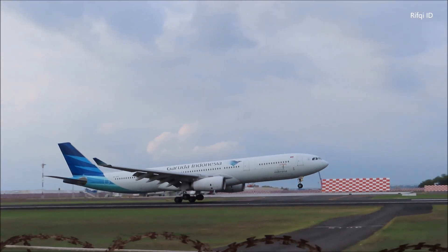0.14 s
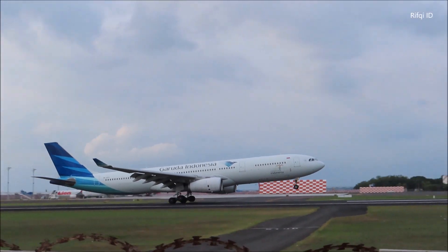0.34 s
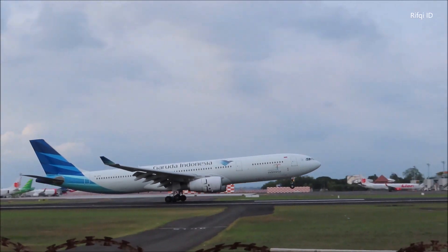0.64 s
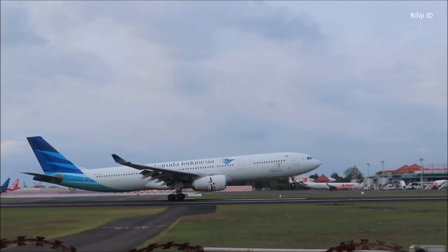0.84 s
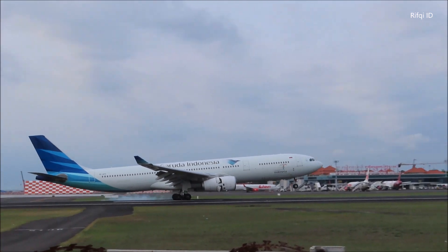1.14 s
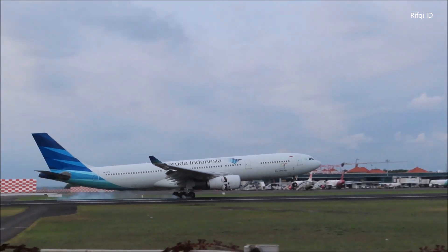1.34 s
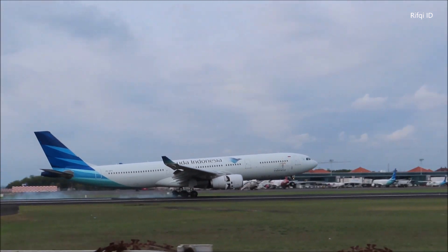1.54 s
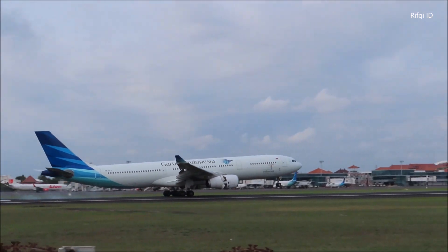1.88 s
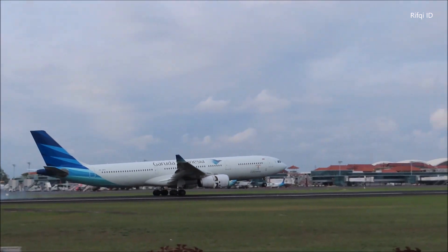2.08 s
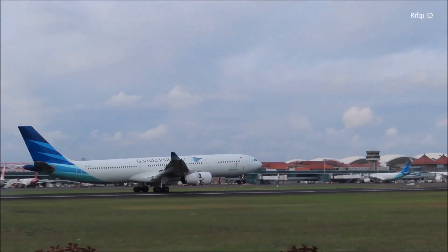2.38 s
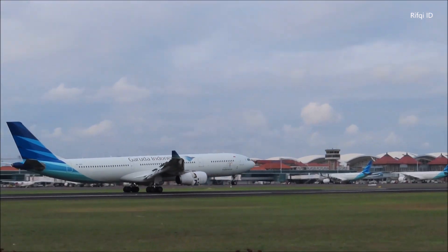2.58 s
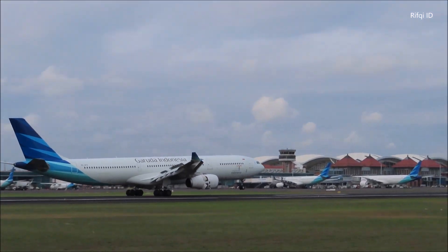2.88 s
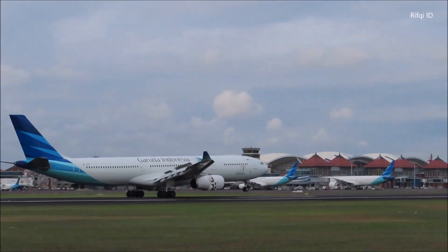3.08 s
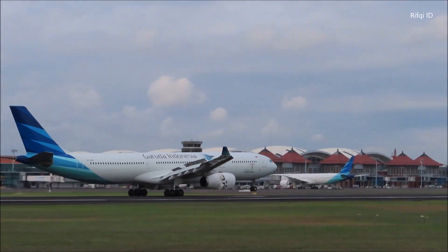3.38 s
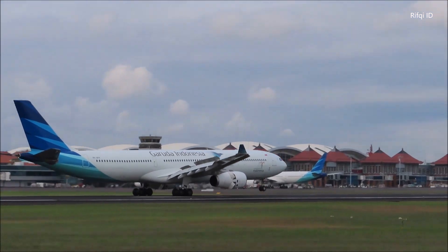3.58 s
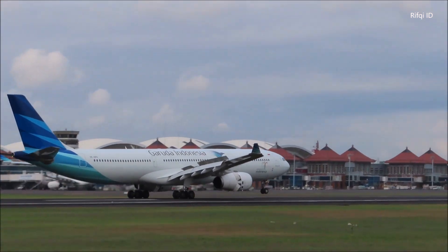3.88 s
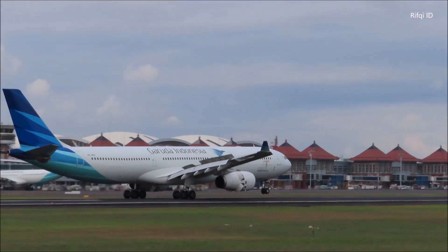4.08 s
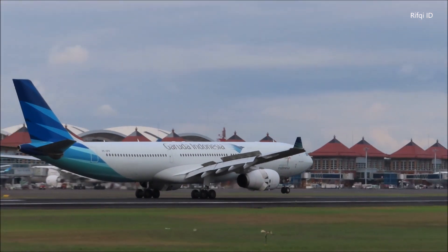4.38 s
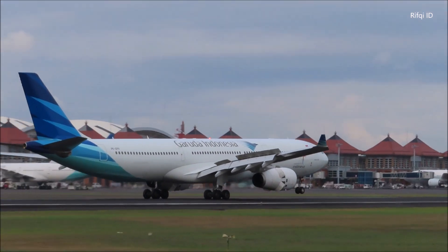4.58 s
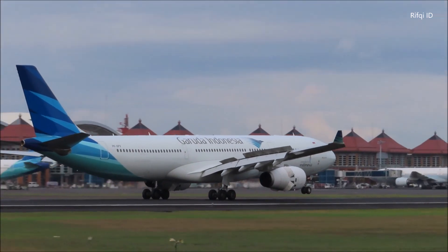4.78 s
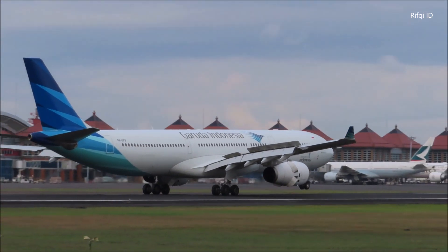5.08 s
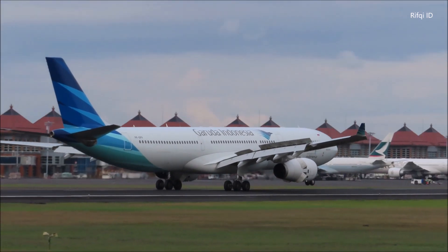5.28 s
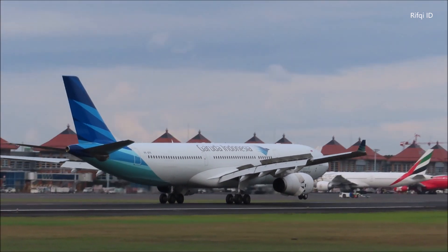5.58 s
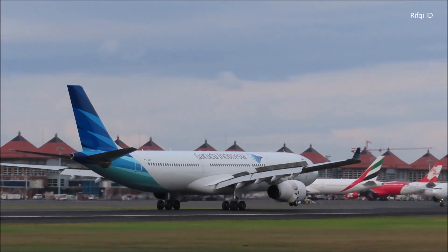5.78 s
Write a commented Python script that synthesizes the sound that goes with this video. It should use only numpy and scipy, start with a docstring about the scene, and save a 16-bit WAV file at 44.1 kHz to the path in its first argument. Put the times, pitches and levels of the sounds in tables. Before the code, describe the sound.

Strong wind booms and splutters on the microphone as a twin-jet airliner touches down, its roaring rush swelling as it rolls past.

```python
"""On an open runway, a twin-jet airliner touches down and rolls past while wind beats on the microphone.
The engines are coloured noise: they rush, and after 3.7 s the exhaust roar swells as the tail turns near.
Faint gliding tones make the engine whine, and a brief bright noise is the tyres scuffing.
Wind is deep noise shaped by gusts and single eddies: it booms and splutters, then eases to a soft rumble."""
import sys
import numpy as np
from scipy import signal
from scipy.fft import rfft, irfft
from scipy.io import wavfile
from scipy.ndimage import uniform_filter1d

SR = 44100
rng = np.random.default_rng(int(sys.argv[2]) if len(sys.argv) > 2 else 0)


def file_out(sig):
    """Save sig as 16-bit WAV at sys.argv[1]."""
    # one column per channel
    cols = np.atleast_2d(sig).T
    # limit, then scale
    lim = np.clip(cols, -1, 1)
    pcm = np.round(lim * 32767).astype(np.int16)
    wavfile.write(sys.argv[1], SR, pcm)


N = 261513
TIME = np.arange(N) / SR
FREQ = np.maximum(np.arange(N // 2 + 1) * SR / N, 1)

# A "base" level has a further offset added by the function that uses it.
# Edges of the body, roar, hiss and air bands: low f/Hz, high f/Hz
JET_BANDS = [(650, 1400), (1600, 3300), (4000, 7000), (8000, 12000)]
# Broad colour of the jet noise: f/Hz, relative level per Hz/dB
JET_COLOUR = [(25, -21), (55, -8), (130, 0.5), (320, -4), (520, -6.5), (1000, -3.5), (2000, -4),
              (3200, -4.5), (5200, -9.5), (6500, -14), (7700, -19), (8400, -23.5), (10000, -28.5),
              (12000, -36.5), (14500, -49)]
# Base loudness of the engine roar at the microphone: t/s, level/dB
ROAR_LEVEL = [(0.0, -34.5), (0.23, -32.5), (0.46, -35), (0.58, -41), (0.7, -39), (0.8, -39.5),
              (0.97, -39.5), (1.08, -33.5), (1.24, -36.5), (1.37, -29.5), (1.48, -29.5), (1.6, -33),
              (1.87, -27), (1.98, -30.5), (2.04, -23.5), (2.19, -24.5), (2.25, -27.5), (2.4, -25),
              (2.5, -29), (2.68, -26), (2.77, -28), (3.01, -26.5), (3.09, -32), (3.32, -30.3), (3.45, -29),
              (3.65, -29), (3.75, -26), (3.85, -19), (3.95, -19), (4.22, -20), (4.31, -18), (4.68, -20),
              (4.87, -18.5), (5.1, -21.5), (5.26, -24.5), (5.38, -24.5), (5.56, -18.5), (5.75, -21),
              (5.92, -23)]
# Base level of the body of the rush against the roar, thin early in the roll: t/s, level/dB
BODY_AGAINST_ROAR = [(0.0, 2), (0.6, 3.5), (1.25, 0.5), (1.45, -6.5), (1.85, -11), (2.04, -6), (2.55, -6.5),
                     (3.02, -13.5), (3.2, -7.5), (3.6, -1.5), (3.71, 4), (3.87, -3), (4.15, -0.5),
                     (4.33, -4.5), (4.5, -2.5), (4.87, -4), (5.3, -2), (5.56, -2.4), (5.9, -5.5)]
# Flares and fades of the treble against the roar: t/s, level/dB before weighting
BRIGHTNESS = [(0.0, 1.5), (0.43, 4.5), (0.61, 2.5), (0.78, 4), (1.08, 4.5), (1.7, 3), (1.8, -2),
              (1.95, 2.5), (2.4, -1.1), (2.81, 0.5), (2.92, -4), (3.01, 1.5), (3.22, 2.5), (3.45, -1.5),
              (3.65, 1), (3.8, 3), (3.97, 1), (4.24, -2), (4.32, 1), (4.42, -1.5), (4.7, -2), (4.87, -2),
              (5.02, 0.6), (5.28, 2), (5.5, 1), (5.58, 3), (5.66, 0.1), (5.9, 0.5)]
# Hiss, then air: base side-on level at the usual roar/dB, share of the roar's swing (0-1),
# change when tail-on/dB, weight of the brightness (factor)
TREBLE = [(-37, 0.89, -1.5, 1.4), (-49, 0.68, -11.5, 0.71)]
# The ground reflection cancels part of the middle for a moment: t/s, length/s, f/Hz, level/dB
HOLLOWS = [(1.652, 0.17, 1600, -4.5), (3.06, 0.086, 1410, -5.5), (3.937, 1, 1400, -3)]
# Humps and hollows that reflections leave in the jet noise: f/Hz before sinking, width/Hz, level/dB
RIPPLE = [(700, 140, 1.5), (920, 130, -3.5), (1180, 200, 1.5), (1530, 170, -2.4), (1840, 260, 3),
          (2210, 240, -2.8), (2630, 320, 2.8), (2940, 150, -1), (3490, 180, -1.6), (3780, 220, 1),
          (4110, 240, -2.3), (5250, 400, 2.5), (5700, 250, -1.3), (6490, 240, -3.3), (6980, 500, 2.1)]
# The humps and hollows sink in pitch as the aircraft passes: t/s, pitch factor
RIPPLE_SINK = [(0.0, 1.06), (1.3, 1.05), (1.9, 1.028), (2.5, 1.015), (3.5, 1.005), (4.7, 0.994),
               (5.9, 0.975)]
# Diffuse share of the jet noise, side against mid: f/Hz, level/dB
DIFFUSE = [(60, -66), (150, -64), (280, -57), (700, -97), (1300, -67), (2300, -85), (4200, -14),
           (5500, -18), (7500, -0.5), (10000, -13), (14000, 6)]
# Differences between the two microphone ports, added where they overlap:
# f/Hz, width/Hz, right above left level/dB, right leads/rad
PORTS = [(4400, 1150, 4.5, 0.45), (5430, 860, 2.5, .1), (7300, 2240, 5, 1.3)]
# Base level of the main tyres scuffing up to speed at touchdown: t/s, level/dB
SCUFF_LEVEL = [(1.15, -50), (1.29, -36.5), (1.38, -32.5), (1.47, -35.5), (1.6, -36), (1.74, -36),
               (1.95, -51)]
# Colour of the scuffing rubber: f/Hz, relative level per Hz/dB
SCUFF_COLOUR = [(500, -27), (1400, -21), (2200, -3), (2700, 4), (3700, -1), (5200, -0.5), (6500, -8.5),
                (8500, -15.5), (12000, -25)]
# Faint fan and turbine tones: start t/s, end t/s, start f/Hz, end f/Hz, base level/dB
WHINES = [(-0.4, 0.9, 4160, 4200, -50), (-0.2, 0.9, 2750, 2775, -53), (1.95, 2.6, 1485, 1450, -39),
          (3.08, 3.45, 1435, 1395, -42), (2.1, 2.35, 2715, 2690, -41), (1.76, 2.06, 7240, 7230, -54),
          (1.92, 2.12, 4820, 4780, -46)]
# Short spits in the hiss: t/s, level/dB, length/s
SPITS = [(1.553, -29, 0.0091), (1.665, -37, 0.017), (1.873, -31.5, 0.015), (2.18, -35, 0.04),
         (2.688, -38, 0.03), (4.335, -38, 0.04)]
# Gusts that swell and die at the microphone: t/s, base level/dB, length/s
GUSTS = [(0.15, -25.5, 0.26), (0.52, -17, 0.3), (0.9, -16, 0.49), (1.2, -13, 0.25), (1.55, -17, 0.27),
         (2.07, -16.5, 0.25), (2.39, -19.5, 0.2), (2.79, -28.5, 0.15), (3.14, -30.5, 0.18),
         (3.35, -28.5, 0.051), (4.42, -32, 0.23), (4.5, -19.5, 0.058), (4.86, -19, 0.12), (5.09, -23, 0.11),
         (5.67, -31.5, 0.2), (5.91, -23.5, 0.079)]
# Strongest single eddies: t/s before the rise, base level/dB, length/s
BUFFETS = [(0.072, -6.5, 0.006), (0.092, -11, 0.019), (0.154, -4.5, 0.007), (0.239, 1, 0.004),
           (0.3, -18, 0.0096), (0.356, -3.5, 0.008), (0.374, 1, 0.0085), (0.421, -3.5, 0.0057),
           (0.444, -5.5, 0.0095), (0.488, -2, 0.018), (0.522, -2, 0.016), (0.547, -1.5, 0.012),
           (0.572, 1, 0.0064), (0.638, -2.5, 0.0085), (0.651, -4.5, .012), (0.728, 1, 0.019),
           (0.795, -4.5, 0.01), (0.861, -7, 0.013), (0.872, -6, 0.0061), (0.931, -6, 0.0072),
           (1.002, -0.5, 0.0074), (1.092, -3.5, 0.016), (1.184, 0.5, 0.016), (1.284, -1, 0.0059),
           (1.305, 0.5, 0.012), (1.487, -5, .007), (1.573, -15, 0.016), (1.708, -4, 0.018),
           (1.753, -6, 0.014), (1.899, -9, 0.0085), (1.934, -9.5, 0.012), (2.022, -7.5, 0.0079),
           (2.064, -7, 0.015), (2.122, -13, 0.0067), (2.149, -1.5, 0.0085), (2.365, -5, 0.0047),
           (2.458, -12, 0.0051), (2.563, -13, 0.0069), (2.605, -11, 0.0067), (2.649, -15, .006),
           (2.706, -14.5, 0.0049), (2.763, -14, .006), (2.807, -10.5, 0.012), (2.86, -13, 0.0079),
           (2.913, -14, 0.0044), (2.974, -15.5, 0.022), (3.013, -12, 0.0061), (3.033, -9, 0.0078),
           (3.051, -3, 0.017), (3.109, -19, 0.018), (3.14, -8, 0.0088), (3.151, -5.5, 0.0062),
           (3.173, -14, 0.0054), (3.198, -11, 0.016), (3.224, -3.5, 0.0039), (3.282, -12, 0.021),
           (3.328, -13.5, 0.0059), (3.354, -13, 0.024), (3.5, -19.5, 0.023), (4.01, -22.5, 0.016),
           (4.375, -14.5, .007), (4.495, -7, 0.007), (4.87, -7.5, 0.0092), (4.915, -8, 0.0056),
           (5.012, -5, 0.005), (5.305, -17.5, .014), (5.607, -11, 0.0084), (5.692, -16, .008),
           (5.781, -10.5, 0.0088), (5.897, -9.5, .007)]
# Hardest eddies, which splutter: t/s, base level/dB, f/Hz, length/s
SPLUTTERS = [(0.5, -25, 730, 0.0046), (0.529, -14, 865, 0.0056), (0.584, -26, 800, .006),
             (0.742, -27, 736, 0.013), (0.88, -27.5, 850, 0.015), (1.108, -17, 680, 0.0062),
             (1.155, -16.5, 760, 0.0045), (1.206, -16, 800, 0.0055), (1.228, -27, 850, 0.016),
             (1.266, -26, 910, 0.022), (1.297, -25.5, 970, 0.02), (1.346, -26, 840, 0.017),
             (3.149, -27.5, 655, 0.005)]
# Colour of the hollow early gusts: f/Hz, relative level per Hz/dB
HARD_WIND = [(20, -46), (50, -21.5), (100, -11), (170, -6), (260, -3), (380, -3.5), (470, -1), (500, -16),
             (535, -21.5), (700, -27), (1000, -38.5), (2000, -22.5)]
# Colour of the soft later gusts: f/Hz, relative level per Hz/dB
SOFT_WIND = [(20, -33), (50, -15), (100, -10.5), (160, -2.5), (260, 2.5), (350, -0.5), (480, -9.5),
             (650, -12), (1000, -58), (2000, -112)]
# Swirl of the wind between the ports, side against mid: f/Hz, level/dB
SWIRL = [(60, -68), (150, -69), (260, -45), (420, -28), (700, -20), (1200, -2.5)]

TURN_S = (0.99, 5.47)  # the aircraft turns from side-on to tail-on between these times
USUAL_ROAR_DB, USUAL_WIND_DB = -29, -20  # reference levels from which swings are counted
HOLLOW_OCTAVES = 0.88  # width of a passing hollow
EASE_S = 3.42  # the gusts start to turn soft here
BREEZE_DB = -41  # base wind pressure between the gusts
EDDY_DB, EDDY_SCATTER_DB, EDDY_FOLLOW = -20.5, 0.5, 0.6  # level in usual wind, spread, share of wind's swing
EDDY_COUNT, EDDY_LENGTH_S = 55, 0.0098  # lesser eddies come at random
BUFFET_RISE_S = 0.0084
TOP_HZ = 14400


def jet(body_db=-1.73, roar_db=0.34, hiss_db=-2.5, air_db=-0.1, rumble_db=-7, shimmer_db=1.06, flicker_db=0.64):
    """Exhaust, airframe and rolling noise; moving air makes the bands flicker together and alone."""
    body, roar, hiss, air = jet_levels()
    spectrum = two_ears(undb(over_freq(JET_COLOUR)), DIFFUSE)
    middle = spectrum.mean(axis=0)
    levels = [body + body_db, roar + roar_db, hiss + hiss_db, air + air_db]
    gains = []
    for (low, high), level in zip(JET_BANDS, levels):
        in_band = (FREQ > low) & (FREQ < high)
        own_level = np.std(irfft(middle * in_band, N))
        gains.append(level - 20 * np.log10(own_level))
    # the deep rumble follows the body at half its swing
    rumble = (gains[0] + gains[0].max()) / 2 + rumble_db
    gains = [rumble] + gains
    # the rumble sits at 300 Hz, the others in the middle of their bands
    places = np.r_[np.log2(300), np.log2(JET_BANDS).mean(axis=1)]
    together = flicker_db * walk(27)
    octaves = np.arange(8, 14.1, .5)  # log2 of frequency in Hz
    out = 0
    for octave, pick in zip(octaves, np.eye(len(octaves))):
        band = irfft(spectrum * np.interp(np.log2(FREQ), octaves, pick), N)
        # blend the gains of the two nearest places
        shares = [np.interp(octave, places, one) for one in np.eye(len(places))]
        db = sum(share * gain for share, gain in zip(shares, gains))
        alone = shimmer_db * walk(11.3)
        out = out + band * undb(db + hollow_db(octave) + together + alone)
    return out


def jet_levels():
    """Body, roar, hiss and air in dB: the treble swings less than the roar, flares, and fades tail-on."""
    roar = np.interp(TIME, *np.transpose(ROAR_LEVEL))
    body = roar + np.interp(TIME, *np.transpose(BODY_AGAINST_ROAR))
    bright = np.interp(TIME, *np.transpose(BRIGHTNESS))
    tail_on = np.interp(TIME, TURN_S, [0, 1])
    treble = []
    for db, follow, turn_db, weight in TREBLE:
        swing = follow * (roar - USUAL_ROAR_DB)
        treble.append(db + swing + turn_db * tail_on + weight * bright)
    hiss, air = treble
    return body, roar, hiss, air


def hollow_db(octave):
    """Passing dips that the ground reflection cuts into the band at this octave."""
    total = 0
    for s, length, hz, db in HOLLOWS:
        nearness = bell(octave, np.log2(hz), HOLLOW_OCTAVES)
        total = total + db * bell(TIME, s, length) * nearness
    return total


def reflections(x, early_share=0.32):
    """Reflections colour the rush: humps and hollows deepen once it is rolling and sink as it passes."""
    times, factors = np.transpose(RIPPLE_SINK)
    spectrum, coloured = rfft(x), 0
    # fade from each pitch of the ripple to the next
    for factor, pick in zip(factors, np.eye(len(times))):
        ripple = undb(sum(db * bell(FREQ, hz * factor, width) for hz, width, db in RIPPLE))
        coloured = coloured + irfft(spectrum * ripple, N) * np.interp(TIME, times, pick)
    share = np.interp(TIME, [1.2, 2.0], [early_share, 1])
    return x + share * (coloured - x)


def whines(whine_db=0.0):
    """Blade tones surface from the rush, waver and glide in pitch as the aircraft passes."""
    out = 0
    for start, end, start_hz, end_hz, db in WHINES:
        glide = np.interp(TIME, [start, end], [start_hz, end_hz])
        hz = glide * (1 + .005 * walk(50))
        tone = unit(np.sin(2 * np.pi * np.cumsum(hz) / SR))
        progress = np.clip((TIME - start) / (end - start), 0, 1)
        swell = np.sqrt(np.abs(np.sin(np.pi * progress)))
        out = out + tone * swell * undb(db + 2 * walk(5.2))
    return out * undb(whine_db)


def spits():
    """Brief bright spits in the hiss, cut from noise strongest near 5 kHz."""
    colour = undb(over_freq([(2000, -16), (5000, 0), (10000, -11), (14000, -28)]))  # Hz, dB
    return unit(irfft(two_ears(colour, DIFFUSE), N)) * bursts(SPITS)


def tyres(scuff_db=2.5, judder_db=3.0, judder_hz=50):
    """Rubber slides on the runway with a brief bright rush that judders in level."""
    slide = unit(irfft(two_ears(undb(over_freq(SCUFF_COLOUR)), DIFFUSE), N))
    # silent before and after the scuff
    db = np.interp(TIME, *np.transpose(SCUFF_LEVEL), left=-np.inf, right=-np.inf)
    return slide * undb(db + scuff_db + judder_db * walk(judder_hz))


def wind(gust_db=1.37, churn_db=1.75, churn_hz=40, bass_hz=200, bass_squeeze=1.0, squeeze_from_db=-22):
    """Turbulence at the microphone: hollow and hard at first, then soft."""
    strength = wind_strength()
    pressure = undb(strength + gust_db + churn_db * walk(churn_hz))
    hits = eddy_hits(strength)
    soft = np.clip((TIME - EASE_S) / 0.039, 0, 1)
    hard_gusts = np.sqrt(1 - soft) * boom(HARD_WIND, pressure, hits)
    soft_gusts = np.sqrt(soft) * boom(SOFT_WIND, pressure, hits)
    gusts = hard_gusts + soft_gusts
    # fast wind makes smaller eddies, so the bass grows less than the rest while the gusts are hard
    bass = irfft(rfft(gusts) * bell(FREQ, 0, 2 * bass_hz), N)
    recent_hits = uniform_filter1d(hits, size=SR // 20)
    speed_db = 20 * np.log10(undb(strength) + recent_hits / 2)
    excess_db = np.maximum(speed_db - squeeze_from_db, 0) * (1 - soft)
    return gusts - bass + bass * undb(-bass_squeeze * excess_db)


def wind_strength():
    """Wind pressure in dB: gusts on top of a light breeze, added as powers."""
    return 20 * np.log10(np.hypot(undb(BREEZE_DB), bursts(GUSTS)))


def eddy_hits(strength, buffet_db=-6.5):
    """Envelope of single eddies: listed strong ones, and lesser ones at random that grow with the wind."""
    place, size = rng.uniform(-1.054, 1, (EDDY_COUNT, 2)).T
    # one eddy to each equal slice of time, moved at random
    times = (np.arange(EDDY_COUNT) + .5 + place / 2) * TIME[-1] / EDDY_COUNT
    wind_swing = np.interp(times, TIME, strength) - USUAL_WIND_DB
    dbs = EDDY_DB + EDDY_FOLLOW * wind_swing + EDDY_SCATTER_DB * size
    lesser = [(s, db, EDDY_LENGTH_S) for s, db in zip(times, dbs)]
    strong = [(s + BUFFET_RISE_S, db + buffet_db, length) for s, db, length in BUFFETS]
    return bursts(lesser + strong)


def boom(points, pressure, hits):
    """Churning noise and single eddies in one colour; its steep skirts also bound the shortest eddies."""
    colour = undb(over_freq(points)) / (1 + (FREQ / 1500) ** 6)
    skirts = np.sqrt(np.minimum(colour / undb(-8), 1))
    churn = steady(noise(colour / skirts), 0.02) * pressure
    eddies = steady(noise(colour / skirts), 0.0075) * hits
    # half of the skirt is applied after the envelopes
    return irfft(rfft(churn + eddies) * skirts, N)


def splutter(splutter_db=2.5, rasp_db=-4.5, rasp_hz=610, rasp_width_hz=420, rasp_flicker_db=3.5):
    """Strong wind rasps just above the boom, and the hardest eddies break into short splutters."""
    # doubling the decibels makes the rasp grow as the square of the wind pressure
    rasp_level = 2 * wind_strength() + rasp_db + rasp_flicker_db * walk(41)
    out = noise(bell(FREQ, rasp_hz, rasp_width_hz)) * undb(rasp_level)
    for s, db, hz, length in SPLUTTERS:
        flutter = steady(noise(bell(FREQ, hz, 520)), .003)
        out = out + flutter * bursts([(s, db + splutter_db, length)])
    return out


def at_ports(x, swirl_hz=60):
    """Small eddies reach the two microphone ports unequally, large ones alike."""
    side = irfft(rfft(x * walk(swirl_hz)) * undb(over_freq(SWIRL)), N)
    return np.array([x + side, x - side])


def two_ears(gain, side_points):
    """Spectra of a stereo noise: mid is shared, side is opposite, and the ports differ in some bands."""
    mid, side = rfft(rng.standard_normal((2, N)))
    share = undb(over_freq(side_points))
    sign = np.array([[-1], [1]])  # left, right
    # real part: level difference; imaginary part: phase lead
    skew = sum((np.log(undb(db)) + 1j * lead) * bell(FREQ, hz, width) for hz, width, db, lead in PORTS)
    blend = (mid + sign * share * side) / np.sqrt(1 + share ** 2)
    return gain * np.exp(sign * skew / 2) * blend


def undb(db):
    """Decibels to gain."""
    return 10 ** (np.asarray(db) / 20)


def unit(x):
    """Scale to an rms (average strength) of 1."""
    return x / np.sqrt(np.mean(x ** 2))


def over_freq(points):
    """Join (Hz, value) points on a log-frequency axis."""
    hz, value = np.transpose(points)
    return np.interp(np.log(FREQ), np.log(hz), value)


def bell(x, centre, width):
    """A bell of height 1 with the given full width at half height."""
    return .5 ** np.minimum((2 * (x - centre) / width) ** 2, 60)


def noise(gain):
    """Noise of rms 1 with the given gain at each frequency."""
    return unit(irfft(rfft(rng.standard_normal(N)) * gain, N))


def walk(rate):
    """Slow random drift of rms 1 that moves up to about rate times a second."""
    return noise(bell(FREQ, 0, 2 * rate))


def steady(x, seconds):
    """Even out the swells of a noise that last longer than the given time."""
    size = max(int(seconds * SR), 2)
    power = uniform_filter1d(uniform_filter1d(x ** 2, size), size)
    return x / np.sqrt(np.maximum(power, 1e-9))


def bursts(rows):
    """Envelope of brief swells given as (s, dB, length s), added as powers."""
    power = sum(undb(db) ** 2 * bell(TIME, s, length) for s, db, length in rows)
    return np.sqrt(power)


def scene():
    """The aircraft out on the runway and the wind close by."""
    aircraft = reflections(jet()) + tyres() + whines() + spits()
    return aircraft + at_ports(wind() + splutter())


def record(dry):
    """Round the highest peaks of both channels together and cut the top of the treble."""
    middle = dry.mean(axis=0)
    rounded = dry / (1 + (middle / .9) ** 14) ** (1 / 14)
    low_pass = signal.ellip(8, .2, 70, TOP_HZ, fs=SR, output="sos")
    return signal.sosfilt(low_pass, rounded)


dry = scene()
out = record(dry)
file_out(out)
```